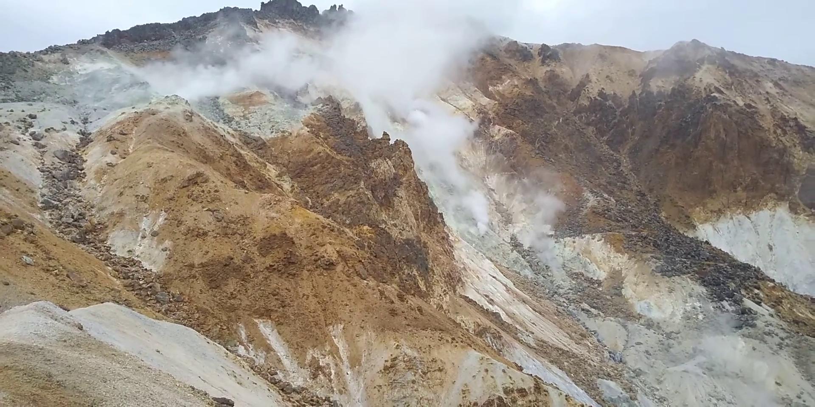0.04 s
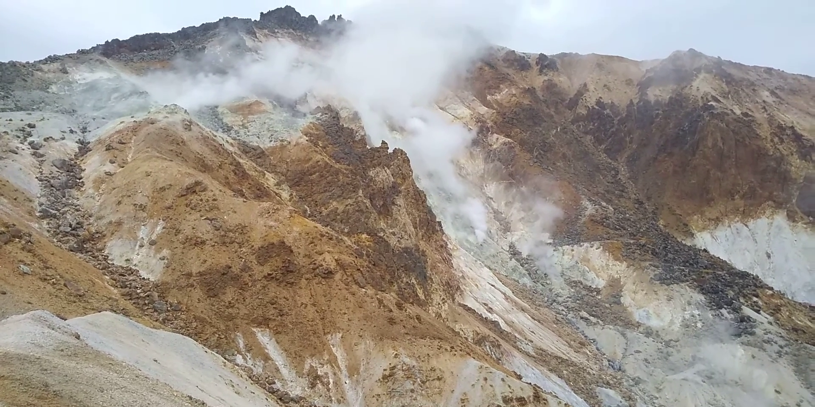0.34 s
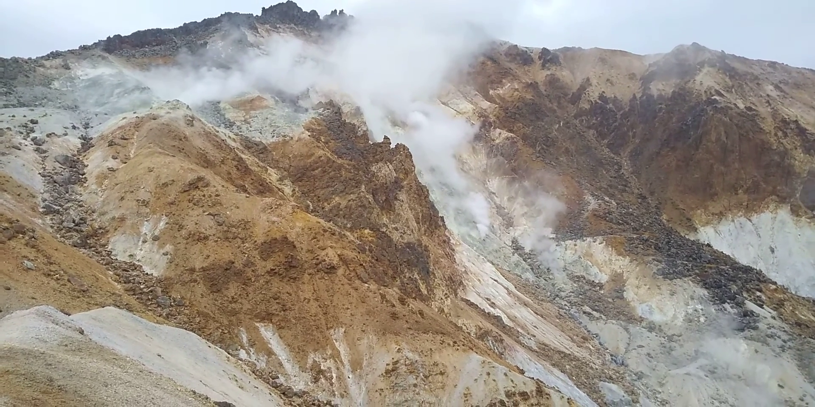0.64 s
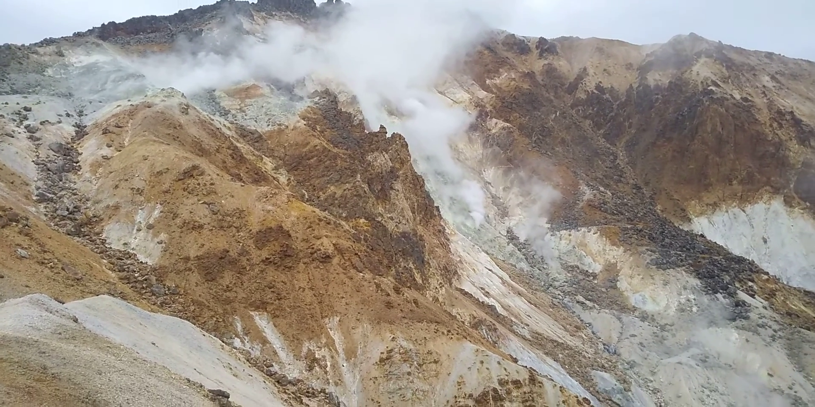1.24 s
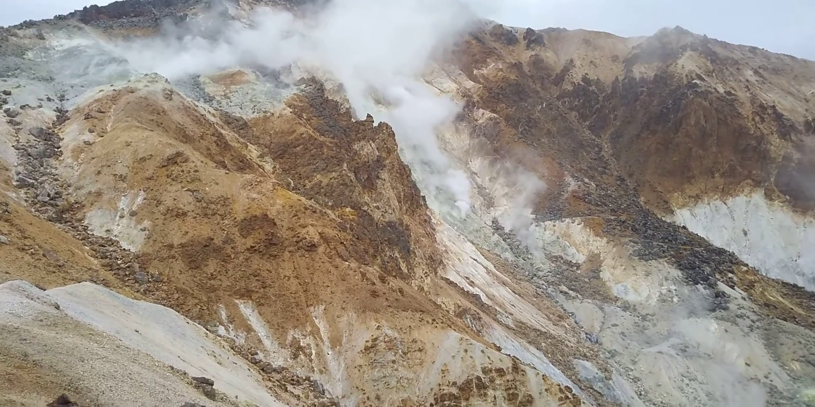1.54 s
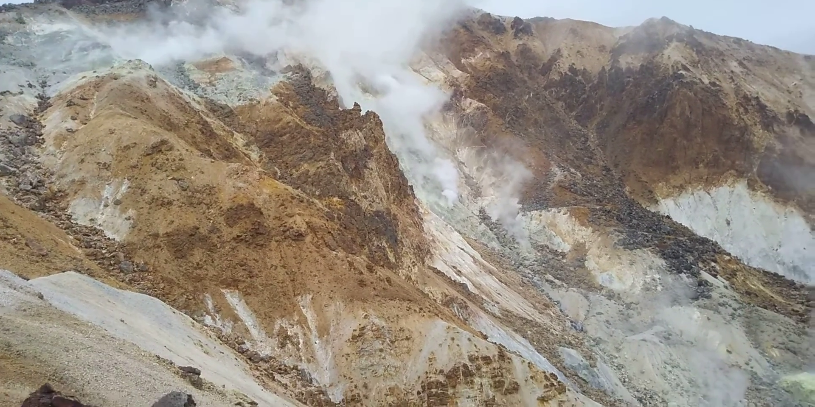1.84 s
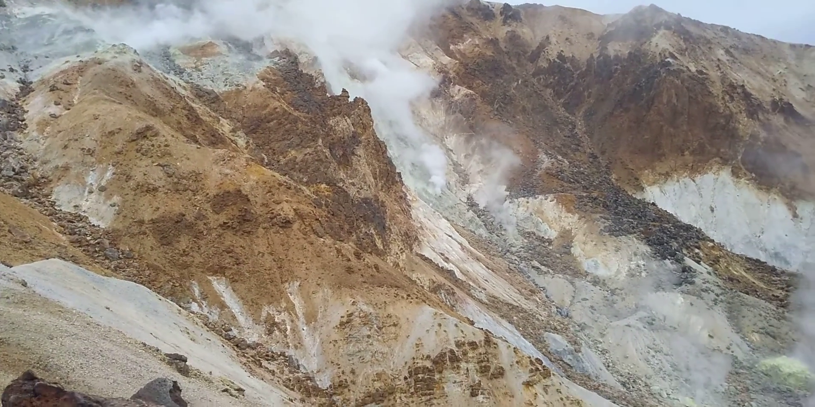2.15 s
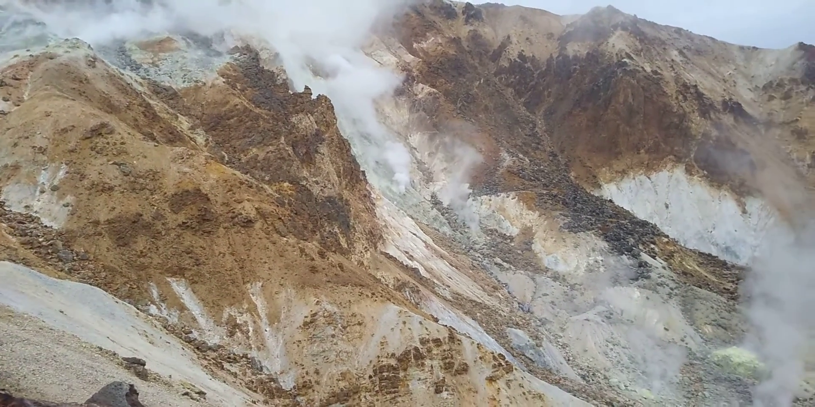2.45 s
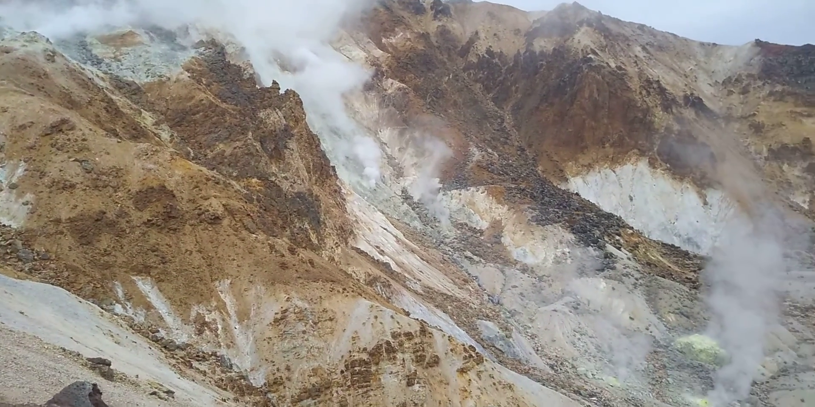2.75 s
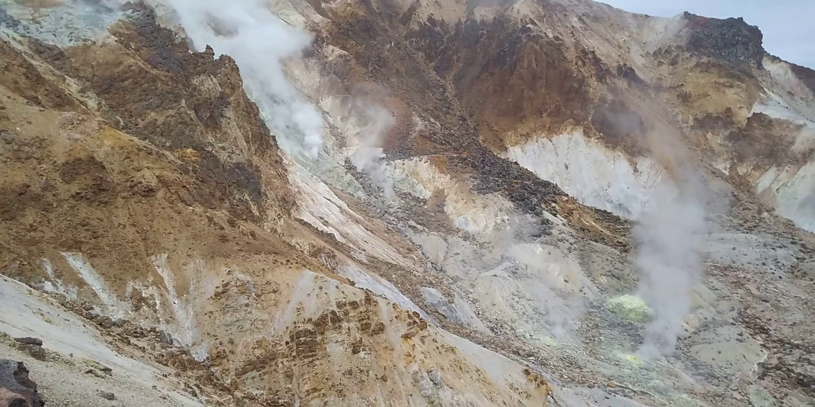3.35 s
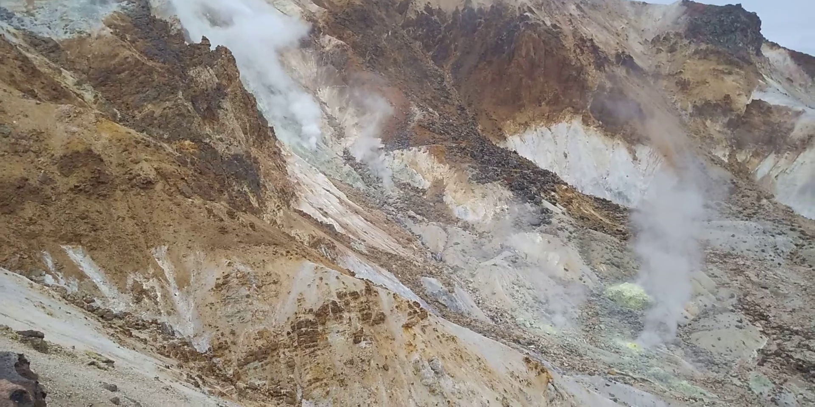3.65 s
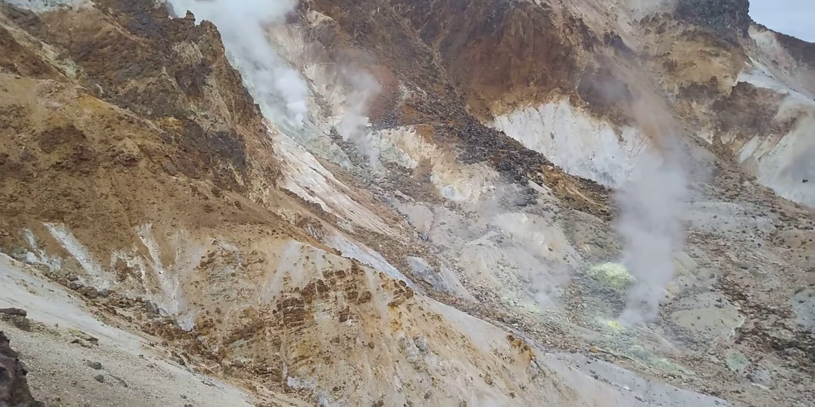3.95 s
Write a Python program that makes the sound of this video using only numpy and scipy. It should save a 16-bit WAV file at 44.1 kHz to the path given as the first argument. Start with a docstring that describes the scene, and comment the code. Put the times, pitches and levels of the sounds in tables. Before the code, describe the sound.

Low gusts buffet the microphone, with faint far steam hiss and a few handling clicks.

```python
"""From the start, steam vents hiss far off across an open volcanic hillside, over faint microphone noise.
At once gusts buffet the microphone with a low, lumpy rumble that reaches higher the harder they blow,
and fingers on the camera's case begin a few scattered dry knocks and tiny scrapes.
The hiss swells near 1 s, then the steam turns a little duller as the camera turns away.
Near the end come some of the hardest gusts and one last knock."""
import sys
import numpy as np
from scipy import signal
from scipy.fft import rfft, irfft
from scipy.io import wavfile
from scipy.ndimage import uniform_filter1d

SR = 44100
rng = np.random.default_rng(int(sys.argv[2]) if len(sys.argv) > 2 else 0)


def pcm_store(signal):
    """Save signal as 16-bit PCM."""
    levels = np.round(np.clip(np.atleast_2d(signal), -1, 1) * 32767)
    wavfile.write(sys.argv[1], SR, levels.astype(np.int16).T)


N = 176400

# Tone colours: how strong each pitch is next to the others (f/Hz, level/dB)
ROAR_COLOUR = [(20, -10), (60, 9.5), (130, 5.5), (250, 3), (400, 1.5), (700, -4), (1300, -4.5),
               (2000, -8.5), (3000, -13.5), (5000, -19.5), (6500, -28), (8500, -49)]  # steam in the whole valley
HISS_COLOUR = [(500, 13), (1200, -15), (2400, -1), (4000, 4.5), (5500, -1), (7000, -7.5), (9000, -13),
               (14000, -25)]  # the steam vents in front
MIC_COLOUR = [(1000, 5.5), (6000, -15), (8000, -15), (10000, -6.5), (12000, -3.5), (14000, -2)]  # the microphone's own noise
RUMBLE_COLOUR = [(15, -44), (28, -25), (42, -5), (56, 5.5), (75, 0.5), (110, -10), (160, -23.5),
                 (300, -46.5), (700, -66.5), (2000, -100)]  # large swirls of air
FLUTTER_COLOUR = [(50, -20), (95, -3.5), (125, 3), (155, 0.5), (200, -7.5), (250, -11.5), (330, -24),
                  (550, -37), (1200, -72), (3000, -91)]  # small swirls that strong gusts add
BUFFET_COLOUR = [(120, -20.5), (210, 7), (290, -7), (400, -21), (700, -45), (1500, -76)]  # still finer swirls torn up by hard puffs
CASE_COLOUR = [(60, -27), (230, 2), (400, -7.5), (550, -4.5), (900, -2.5), (1350, -1), (1900, -6),
               (2500, -7.5), (3100, -10), (4000, -12.5), (7000, -17), (9500, -28.5), (13000, -15),
               (16000, -20)]  # the camera's case when knocked
# How the vents' hiss rises and falls (t/s, level change/dB)
HISS_CHANGES = [(0, 2), (.3, 0.5), (.65, 0.5), (.9, 4.5), (1.15, 4.5), (1.4, 2.5), (1.85, -3), (3, -2.5),
                (4, -3.5)]
# Puffs of wind strike the microphone (middle t/s, length/s, large swirls/dB, small swirls/dB)
WIND_PUFFS = [(0.057, 0.02, -50, -59.5), (0.079, 0.12, -61, -78), (0.408, 0.044, -55.5, -80),
              (0.63, 0.095, -53, -64), (0.729, 0.06, -50, -57), (0.85, 0.084, -42.5, -59),
              (0.91, 0.012, -53, -55.5), (0.982, 0.14, -49.5, -56.5), (1.025, 0.017, -39.5, -60),
              (1.061, 0.032, -45, -56), (1.143, 0.044, -72, -61.5), (1.185, 0.082, -52, -77),
              (1.447, 0.026, -41.5, -53.5), (1.512, 0.067, -53.5, -70), (1.616, 0.037, -51.5, -68),
              (1.675, 0.049, -41, -48.5), (1.744, 0.033, -43.5, -66), (1.845, 0.081, -53.5, -62.5),
              (1.979, 0.035, -37.5, -44), (2.03, 0.03, -40, -60.5), (2.081, 0.022, -37, -48.5),
              (2.161, 0.071, -44.5, -51.5), (2.237, 0.039, -41, -64), (2.281, 0.045, -50, -62),
              (2.407, 0.17, -65, -85), (2.529, 0.022, -50, -72), (2.603, 0.075, -52.5, -66.5),
              (2.728, 0.055, -47.5, -57.5), (2.77, 0.099, -51.5, -63.5), (2.867, 0.035, -53, -73),
              (2.934, 0.047, -44, -57), (2.978, 0.058, -52, -68), (3.082, 0.048, -53, -71),
              (3.149, 0.058, -46, -61.5), (3.231, 0.041, -46.5, -62), (3.269, 0.047, -43.5, -64),
              (3.606, 0.022, -39.5, -67), (3.679, 0.036, -37, -49.5), (3.74, 0.04, -38, -48.5),
              (3.812, 0.015, -45, -43), (3.862, 0.075, -39.5, -40.5), (3.974, 0.052, -41.5, -48)]
# Fingers knock on the case (t/s, level/dB, dull above f/Hz, ring f/Hz, ring boost/dB, thump boost/dB)
FINGER_KNOCKS = [(0.056, -55, 6000, 1500, -11, -19), (.0642, -28.5, 9000, 1720, 4.5, -8.5),
                 (0.1492, -53, 2800, 1900, 7, -8), (0.6409, -50.5, 6030, 430, 12, 14.5),
                 (1.291, -54.5, 2500, 1490, 9, -12), (1.2982, -33.5, 4150, 2850, 7, 1),
                 (1.3114, -49, 2500, 1800, 1, -12), (1.3349, -39, 5000, 1210, 2.5, -3),
                 (1.4376, -50, 2200, 2450, 11, -6), (1.7755, -48, 3500, 1000, 3, 5),
                 (2.0724, -54, 1600, 900, 2, -1), (2.1426, -50, 6000, 995, 7, -9),
                 (3.963, -43, 2970, 1390, 4, 12)]
# Skin slips on the case (t/s, length/s, level/dB, centre f/Hz, width/octaves)
SKIN_SCRAPES = [(.069, 0.0021, -65, 6900, 0.25), (0.0691, 0.0018, -68, 13000, .25),
                (1.292, .0015, -75, 5750, 0.15), (1.3324, 0.0032, -56, 5760, 0.23),
                (1.572, 0.0016, -77, 12000, .25), (1.7755, 0.0014, -77.5, 6300, 0.13),
                (2.144, 0.00049, -65.5, 11800, .35)]


def gain(db):
    """Turns decibels into a number to multiply a sound by."""
    return 10 ** (np.asarray(db) / 20)


def unit(x):
    """Scales a sound to an average power of 1."""
    return x / np.sqrt(np.mean(x ** 2) + 1e-20)


def level_at(colour, hz):
    """Looks up a tone colour's level in dB at the given frequencies."""
    f, db = np.transpose(colour)
    return np.interp(np.log(hz + 1), np.log(f + 1), db)


def add(mix, start_s, sound):
    """Mixes a sound in at the given time."""
    part = mix[max(round(start_s * SR), 0):][:len(sound)]
    part += sound[:len(part)]


def noise(colour):
    """Steady noise with the given tone colour."""
    shape = gain(level_at(colour, np.fft.rfftfreq(N, 1 / SR)))
    return unit(irfft(rfft(rng.standard_normal(N)) * shape, N))


def drifting_noise(colour, patchy_db):
    """Far noise whose pitches swell and fade in patches as the air moves."""
    _, _, bands = signal.stft(noise(colour), SR, nperseg=1024, noverlap=768)
    patches = uniform_filter1d(rng.standard_normal(bands.shape), size=14, axis=0)  # smooth over pitch
    patches = uniform_filter1d(patches, size=18, axis=1)  # and over time
    _, sound = signal.istft(bands * gain(patchy_db * unit(patches)), SR, nperseg=1024, noverlap=768)
    return unit(sound[:N])


def steam(roar_db=-72, hiss_db=-81.5):
    """Escaping steam makes a steady far roar, and a brighter hiss that fades as the camera turns."""
    change_db = np.interp(np.arange(N) / SR, *np.transpose(HISS_CHANGES))
    roar = gain(roar_db) * drifting_noise(ROAR_COLOUR, patchy_db=0.88)
    hiss = gain(hiss_db + change_db) * drifting_noise(HISS_COLOUR, patchy_db=0.1)
    return roar + hiss


def microphone_noise(hiss_db=-83.5, whine_db=-104, whine_hz=9375, width_hz=25, whine_end_s=1.35):
    """The electronics add a thin hiss, with a faint high whine at first."""
    off_pitch = (np.fft.rfftfreq(N, 1 / SR) - whine_hz) / width_hz
    whine = unit(irfft(rfft(rng.standard_normal(N)) / (1 + off_pitch ** 2), N))
    fade_out = np.clip((whine_end_s - np.arange(N) / SR) * 10, 0, 1)
    return gain(hiss_db) * noise(MIC_COLOUR) + gain(whine_db) * whine * fade_out


def puff_force(times, lengths, levels_db):
    """Each puff swells and dies away; overlapping puffs add their power."""
    t = np.arange(0, N, 40) / SR
    from_middle = abs(t[:, None] - times) / (lengths / 2)
    bell_shapes = .5 ** (from_middle ** 2.04)
    power = ((gain(levels_db) * bell_shapes) ** 2).sum(1)
    return np.interp(np.arange(N) / SR, t, np.sqrt(power))


def swirls(colour, steady_s=.028):
    """Swirling air makes irregular pressure swings of nearly even force."""
    pressure = noise(colour)
    window = signal.windows.hann(int(2 * steady_s * SR))
    power = signal.fftconvolve(abs(signal.hilbert(pressure)) ** 2, window / window.sum(), "same")
    return unit(pressure / np.sqrt(np.maximum(power, 1e-6)))


def wind(breeze_db=-71.5, hard_puff_db=-45.5, buffet_db=-65, lead_s=.004):
    """Puffs over a light breeze drive large and small swirls; hard puffs break them into finer ones."""
    times, lengths, large_db, small_db = np.transpose(WIND_PUFFS)
    large_force = np.hypot(puff_force(times, lengths, large_db), gain(breeze_db))
    small_force = puff_force(times - lead_s, lengths, small_db)  # small swirls arrive first
    flutter = swirls(FLUTTER_COLOUR)
    breaking = unit(np.maximum(flutter, 0) ** 2 * noise(BUFFET_COLOUR))  # a burst on each upward swing
    buffet = gain(buffet_db) * (small_force / gain(hard_puff_db)) ** 1.2 * breaking
    rumble = swirls(RUMBLE_COLOUR)
    return gain(.5) * large_force * rumble + gain(-1) * small_force * flutter + buffet


def knock(db, dull_hz, ring_hz, ring_db, thump_db, size):
    """A finger's push makes the case tick and thump. The push comes `size` samples into the sound."""
    ring_octaves, thump_hz, thump_decay_s = 0.37, 120, 0.0029
    rustle_db, rustle_rise_s, rustle_decay_s = -13.5, 0.0043, 0.0075
    hz = abs(np.fft.fftfreq(size, 1 / SR))
    t = np.arange(-size, size) / SR
    dulling = -10 * np.log10(1 + (hz / dull_hz) ** 2.6)  # a soft touch loses the highs
    ring = ring_db / (1 + (np.log2((hz + 1) / ring_hz) / ring_octaves) ** 2)  # set by the spot hit
    colour = gain(level_at(CASE_COLOUR, hz) + dulling + ring)
    # Turn that colour into a tick that starts sharply and dies away.
    tick = np.fft.ifft(np.exp(np.conj(signal.hilbert(np.log(colour))))).real
    settling = np.exp(np.minimum(t / rustle_rise_s, -t / rustle_decay_s))
    rustle = rng.standard_normal(len(t)) ** 3 * settling  # skin rubs as the finger lands
    contact = (t == 0) + gain(rustle_db) * rustle / np.linalg.norm(rustle)
    tap = signal.fftconvolve(contact, tick / abs(tick).max())[:len(t)]
    since_push = np.maximum(t, 0)
    thump = -np.sin(2 * np.pi * thump_hz * since_push) * np.exp(-since_push / thump_decay_s)
    return gain(db) * (tap + gain(thump_db - 4.5) * thump)


def scrape(length_s, db, centre_hz, width_octaves, size=1024):
    """Slipping skin makes a very short burst of noise around one pitch."""
    octaves = np.log2((np.fft.rfftfreq(size, 1 / SR) + 1) / centre_hz)
    band = np.exp(-.5 * (octaves / width_octaves) ** 2)
    rasp = irfft(rfft(rng.standard_normal(size)) * band)
    count = int(np.clip(length_s * SR, 8, size))
    return gain(db) * unit(rasp[:count] * signal.windows.tukey(count, .5))


def fingers(lead_samples=2048):
    """The fingers holding the camera knock and slip on its case."""
    mix = np.zeros(N)
    for push_s, *settings in FINGER_KNOCKS:
        add(mix, push_s - lead_samples / SR, knock(*settings, size=lead_samples))
    for start_s, *settings in SKIN_SCRAPES:
        add(mix, start_s, scrape(*settings))
    return mix


def scene():
    """Wind, steam and fingers, all heard at one microphone."""
    return (wind() + steam() + fingers())[None]


def record(dry):
    """The microphone drops the deepest rumble, adds its own noise and cuts off the highest pitches."""
    lowest_hz, highest_hz = 30, 14300
    thinned = signal.sosfilt(signal.butter(3, lowest_hz, "high", fs=SR, output="sos"), dry)
    treble_cut = signal.firwin(511, highest_hz, window=("kaiser", 9), fs=SR)
    return signal.oaconvolve(thinned + microphone_noise(), treble_cut[None], "same")


dry = scene()
out = record(dry)
pcm_store(out)
```